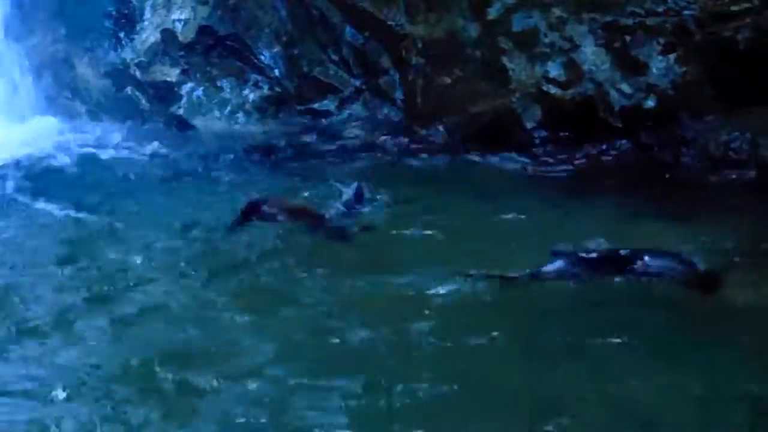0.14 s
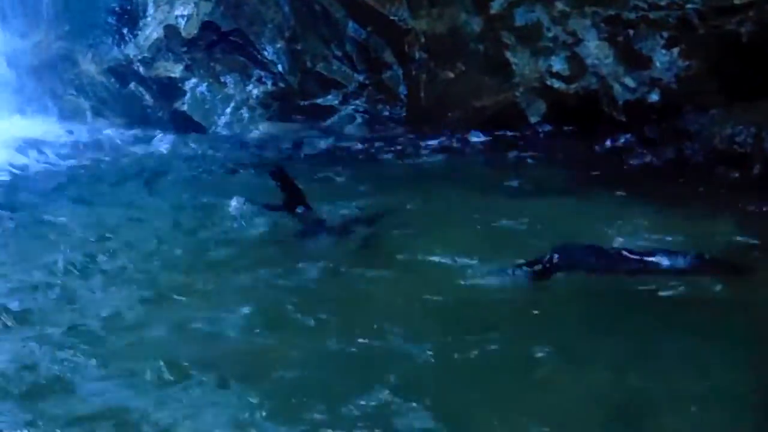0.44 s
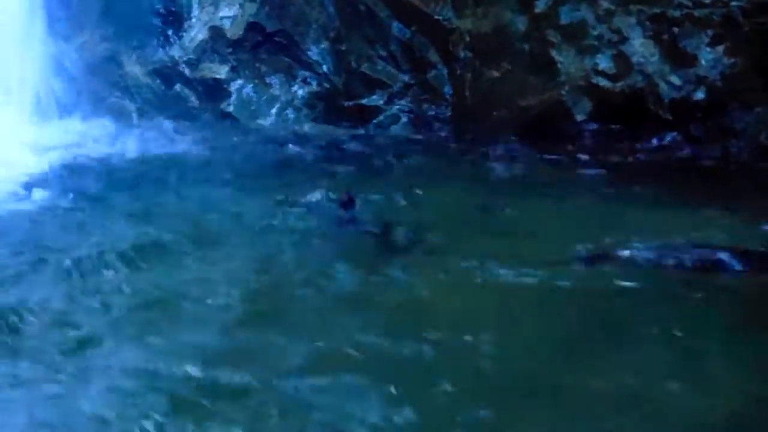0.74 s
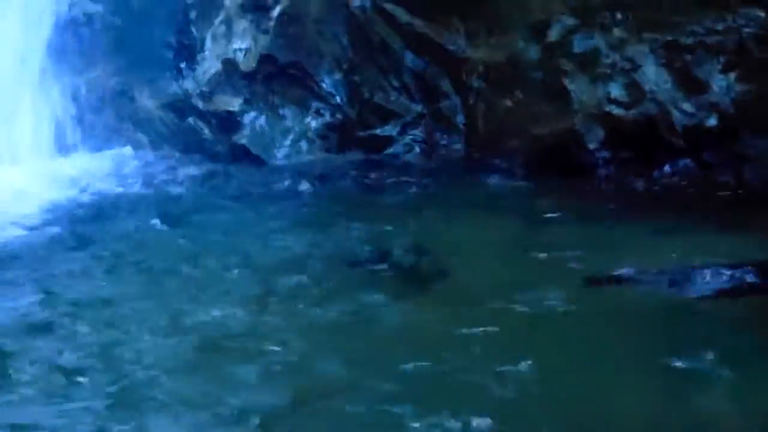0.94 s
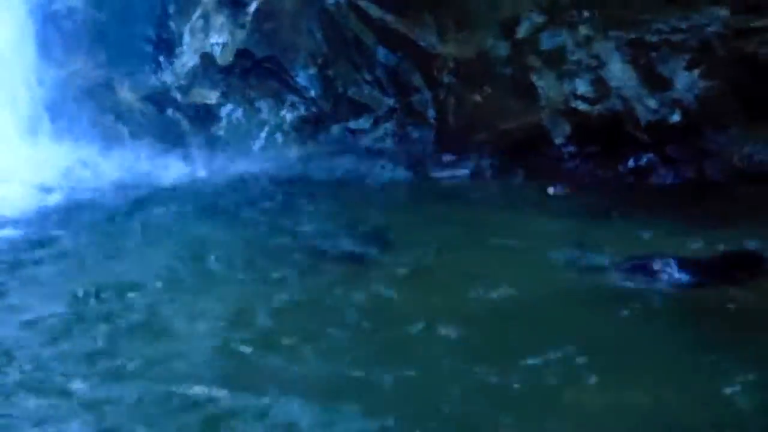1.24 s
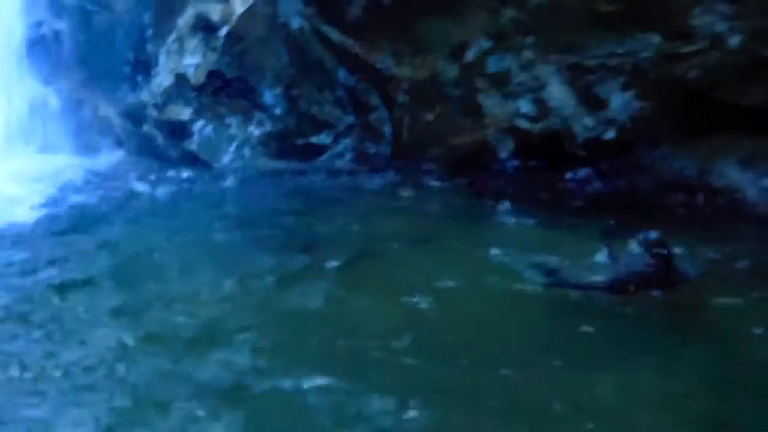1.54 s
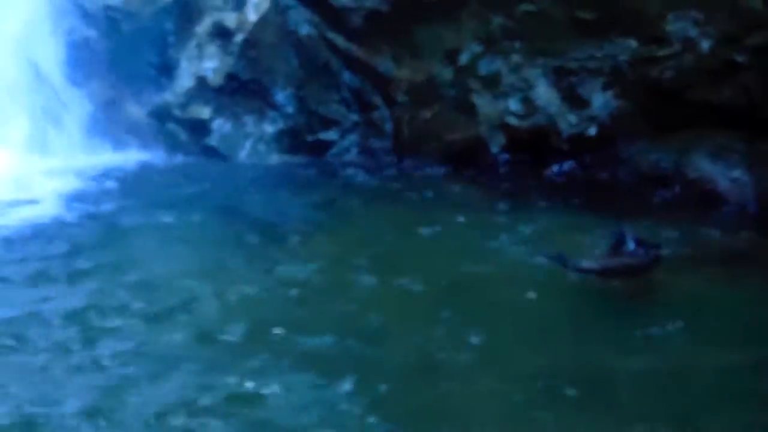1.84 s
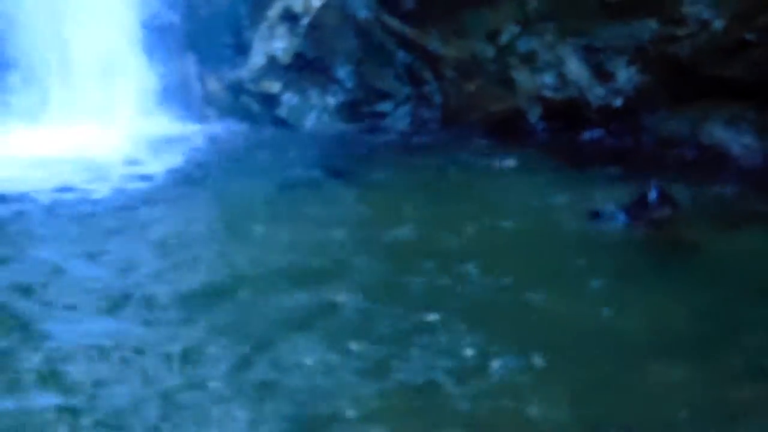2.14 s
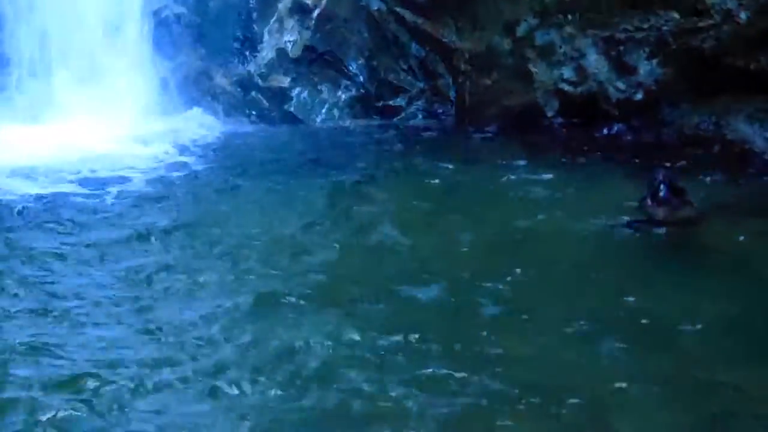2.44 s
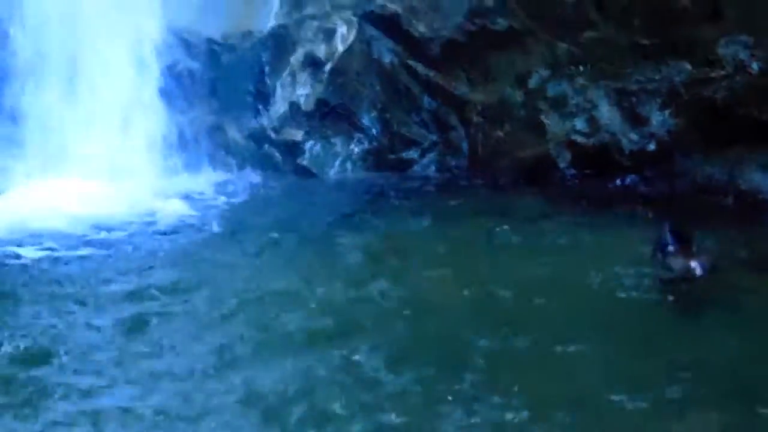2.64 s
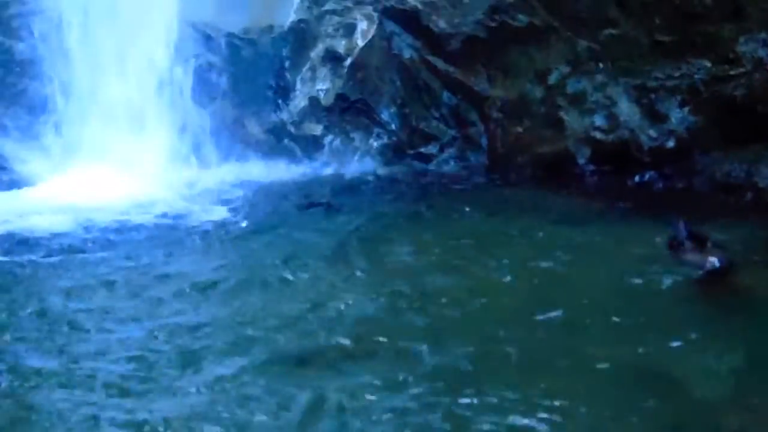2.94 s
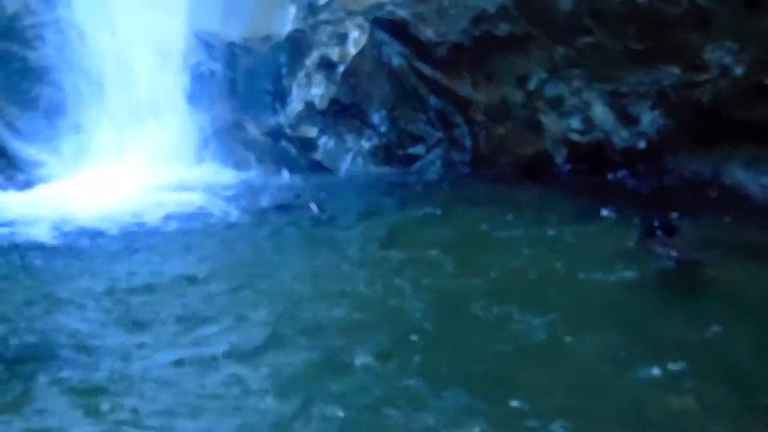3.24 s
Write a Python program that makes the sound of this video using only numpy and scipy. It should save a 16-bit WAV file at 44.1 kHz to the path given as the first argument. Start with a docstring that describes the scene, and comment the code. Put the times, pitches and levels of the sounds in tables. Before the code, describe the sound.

A loud waterfall rushes into a rocky pool outdoors, bright and hissing throughout, dipping slightly near the first second, then swelling with gulps and soft slaps; close stereo microphone catches low puffs of air.

```python
"""Waterfall into a rock pool

A bright rush of spray, made of flickering noise, with a dense patter of ringing drops, lies over
the hollow noise roar and gurgle of the plunge. The rush dips near 1.2 s and peaks near 2.3 s.
Noise bursts slap the pool, and gliding sines gulp as trapped air.
Puffs of air from the fall, made of low noise, buffet the two microphone ports."""
import sys
import numpy as np
from scipy import signal
from scipy.fft import rfft, irfft, next_fast_len
from scipy.io import wavfile
from scipy.ndimage import uniform_filter1d

SR = 44100
rng = np.random.default_rng(int(sys.argv[2]) if len(sys.argv) > 2 else 0)


def log_audio(samples):
    """Write samples as a 16-bit WAV file to the path given in sys.argv[1]."""
    # one column per channel
    frames = np.atleast_2d(samples).T
    # limit to full scale, then quantise
    limited = np.clip(frames, -1, 1)
    pcm = np.round(limited * 32767).astype(np.int16)
    wavfile.write(sys.argv[1], SR, pcm)


N = 149499


def spray(level_db):
    """Countless tiny impacts merge to a hiss, with ringing drops in it; the treble swings most."""
    # tone of the spray: (frequency [Hz], relative level per Hz [dB])
    spray_tone = [(40, -21), (150, -18.5), (600, -17.5), (950, -11.5), (1350, -3.5), (1800, -6), (2900, -2),
                  (4200, -1.35), (6000, -1.5), (7500, -0.5), (9500, 0.5), (11300, 2.5), (12600, 1.1),
                  (14200, -3), (15800, -9.5)]
    drops_db, fat_drops_db = -15, -15  # against the hiss
    hiss = rms_one(churn(flicker_db=0.82, rate_hz=9.8, count=36))
    drops = grains(per_s=2400, cycles=50, spread_db=3.5, low_hz=2194, high_hz=14700, count=48)
    fat_drops = grains(per_s=380, cycles=180, spread_db=2, low_hz=1692, high_hz=4606, count=56)
    mix = hiss + from_db(drops_db) * drops + from_db(fat_drops_db) * fat_drops
    rush = colour(mix, spray_tone)

    # the coarse splash below this pitch takes only a share of the rush's swing
    splash_top_hz, splash_follows = 4500, 0.57
    low_pass = signal.butter(2, splash_top_hz, fs=SR, output="sos")
    splash = signal.sosfiltfilt(low_pass, rush)
    fine_spray = rush - splash
    steadier = from_db((splash_follows - 1) * (level_db - level_db.mean()))

    trim_db, surge_db, surge_rate_hz = 1.49, 0.29, 25
    surging_db = trim_db + level_db + surge_db * drift(surge_rate_hz)
    return (fine_spray + steadier * splash) * from_db(surging_db)


def plunge(swing_db):
    """Clouds of air driven under water roar; single bubbles ring above them."""
    # tone of the roar: (frequency [Hz], relative level per Hz [dB])
    roar_tone = [(25, -7), (80, -10.5), (120, -4), (165, -7), (270, 0.5), (340, -4.5), (430, -4), (520, -5),
                 (620, -0.5), (740, 1.5), (900, -3), (1400, -5), (3000, -19)]
    roar_db, bubbles_db = -30, -34
    follows = 0.97  # share of the rush's swing
    roar = colour(churn(flicker_db=1.1, rate_hz=9.2, count=18), roar_tone)
    bubbles = grains(per_s=600, cycles=38, spread_db=2, low_hz=735, high_hz=3866, count=36)
    gurgle = from_db(roar_db) * roar + from_db(bubbles_db) * bubbles
    return gurgle * from_db(follows * swing_db)


def slaps():
    """A heavier clump of water lands with a short burst of splash."""
    # clumps hitting the pool: (time [s], level [dB])
    clumps = [(2.225, -28), (2.365, -26), (2.59, -25), (2.825, -22)]
    # tone of the bursts: (frequency [Hz], relative level per Hz [dB])
    slap_tone = [(250, -17), (700, -6), (1350, -2.5), (2300, -2), (4000, -11), (9000, -27)]
    force = sum(from_db(db) * swell(start_s, rise_s=0.012)[1] for start_s, db in clumps)
    return force * colour(rng.standard_normal((2, N)), slap_tone)


def gulps():
    """A big pocket of air swells and dies away, rising a little in pitch."""
    # pockets of trapped air: (time [s], starting pitch [Hz], level [dB])
    air_pockets = [(0.16, 267, -26), (.25, 722, -22), (.378, 760, -25), (.587, 1366, -26),
                   (1.138, 720, -30), (2.088, 745, -32), (2.11, 797, -21), (2.23, 976, -25),
                   (2.355, 715, -23.5), (2.378, 1350, -24), (2.587, 253, -32), (2.601, 694, -30),
                   (2.918, 258, -28)]
    rise_s, glide_per_s = 0.0057, 0.22  # glide as a share of the starting pitch
    out = np.zeros(N)
    for start_s, hz, db in air_pockets:
        age, envelope = swell(start_s, rise_s)
        cycles = hz * age * (1 + glide_per_s * age / 2) + rng.random()
        out += from_db(db) * envelope * np.sin(2 * np.pi * cycles)
    return out


def wind(swing_db):
    """Low turbulence, separate at each port: a faint draught and short puffs."""
    # puffs of air on the ports: (time [s], length [s], left level [dB], right level [dB])
    puffs = [(0.107, .05, -48, -31), (0.313, 0.066, -18.5, -33), (0.38, .055, -26, -33),
             (0.522, 0.08, -32, -25.5), (.58, .075, -38, -31), (0.83, 0.039, -28.5, -36),
             (0.955, 0.071, -27.5, -33), (1.017, 0.09, -23, -38), (1.134, 0.043, -33, -42),
             (1.515, 0.061, -30, -66), (1.73, 0.036, -32, -42.5), (2.354, 0.076, -53, -30.5),
             (2.985, 0.066, -38.5, -38)]
    # tone of the buffeting: (frequency [Hz], relative level per Hz [dB])
    buffet_tone = [(15, -17), (35, -1.5), (65, 4.5), (100, -10), (170, -15.5), (300, -60), (900, -72)]
    draught_db, draught_follows = -52, 3.9  # multiple of the rush's swing
    t = np.arange(N) / SR
    force = np.ones((2, 1)) * from_db(draught_db + draught_follows * swing_db)
    for start_s, length_s, left_db, right_db in puffs:
        shape = np.sin(np.pi * np.clip((t - start_s) / length_s, 0, 1))
        puff = from_db([[left_db], [right_db]]) * shape
        force = np.hypot(force, puff)  # unrelated airs add in power
    eddies = colour(rng.standard_normal((2, N)), buffet_tone)
    # even out the eddies over 25 ms, so that the puffs set the level
    local_level = np.sqrt(uniform_filter1d(eddies ** 2, size=1100) + 1e-6)
    return force * eddies / local_level


def stereo_blend(pair):
    """Blend the pair by frequency: nearly mono in the bass, mostly wider in the treble."""
    # stereo image: (frequency [Hz], likeness [0-1], left's phase lead [rad], left minus right [dB])
    image = [(200, 1, 0, 0), (800, .998, 0, 0), (1250, .99, 0, 0), (1600, .925, 0, 0), (2200, .92, 0, 0),
             (2750, .59, .25, -.4), (3800, .44, .53, .9), (4500, .37, .4, 2), (6400, .38, .1, .8),
             (7300, .61, .15, -.4), (9300, .54, .45, -1.3), (10400, .47, .75, -1.6), (12800, .47, .85, -.7),
             (15500, .22, .55, 2.2)]
    size = next_fast_len(N)
    alike, lead, pan_db = at_hz(image, np.fft.rfftfreq(size, 1 / SR))
    alike = np.clip(alike, 0, .9995)
    mid, side = rfft(pair, size) * np.sqrt([(1 + alike) / 2, (1 - alike) / 2])
    turn = from_db(pan_db / 2) * np.exp(.5j * lead)  # half the difference on each channel
    left, right = (mid + side) * turn, (mid - side) / turn
    return irfft(np.array([left, right]), size)[:, :N]


def churn(flicker_db, rate_hz, count):
    """Two unrelated noises, split into bands; each band flickers on its own, alike in both noises."""
    size = next_fast_len(N)
    white = rfft(rng.standard_normal((2, size)))
    edges = np.geomspace(150, 13000, count - 1)
    band = np.searchsorted(edges, np.fft.rfftfreq(size, 1 / SR))
    out = np.zeros((2, N))
    for k in range(count):
        noise = irfft(white * (band == k), size)[:, :N]
        out += noise * from_db(flicker_db * drift(rate_hz))
    return out


def grains(per_s, cycles, spread_db, low_hz, high_hz, count):
    """Random rings of uneven size and direction at count pitches, falling 60 dB in so many cycles."""
    out = np.zeros((2, N))
    for hz in np.geomspace(low_hz, min(high_hz, .45 * SR), count):
        born = np.flatnonzero(rng.random(N) < per_s / count / SR)
        size, angle = rng.random((2, N))[:, born]
        strength = from_db(-spread_db * np.log(size + 0.0043))  # a few stand far out
        direction = np.array([np.cos(2 * np.pi * angle), np.sin(2 * np.pi * angle)])
        clicks = np.full((2, N), 1e-18)
        clicks[:, born] = strength * direction
        # a two-pole resonator rings at each click
        r = from_db(-60 * hz / (cycles * SR))
        w = 2 * np.pi * hz / SR
        out += signal.lfilter([np.sqrt(w), 0, -np.sqrt(w)], [1, -2 * r * np.cos(w), r * r], clicks)
    return rms_one(out)


def swell(start_s, rise_s):
    """Seconds since an event, and its envelope: a quick rise and a slower fall."""
    age = np.clip(np.arange(N) / SR - start_s, 0, 1)
    return age, age / rise_s * np.exp(1 - age / rise_s)


def drift(rate_hz):
    """Slow random wander of spread 1: low-passed noise, drawn at every 40th sample."""
    r = np.exp(-80 * np.pi * rate_hz / SR)
    steps = rng.standard_normal(N // 40 + 2002)
    slow = signal.lfilter([1], [1, -2 * r, r * r], steps)[2000:]  # drop the filter's start
    return np.interp(np.arange(N) / 40, np.arange(len(slow)), rms_one(slow))


def colour(x, spectrum):
    """Filter a sound by a spectrum and bring it to unit power."""
    size = next_fast_len(N)
    db, = at_hz(spectrum, np.fft.rfftfreq(size, 1 / SR))
    return rms_one(irfft(rfft(x, size) * from_db(db), size)[..., :N])


def at_hz(points, hz):
    """The columns of a table, read on a log-frequency axis."""
    f, *columns = np.transpose(points)
    return [np.interp(np.log(hz + 1), np.log(f), c) for c in columns]


def rms_one(x):
    """Scale to unit power."""
    return x / np.sqrt(np.mean(x ** 2) + 1e-20)


def from_db(db):
    """Decibels to gain."""
    return 10 ** (np.asarray(db) / 20)


def scene():
    """The fall with its slaps, blended in stereo, then the gulps and the air on the ports."""
    # level of the rush: (time [s], level before the spray's trim [dB])
    rush_level = [(0, -14.5), (.62, -15), (.75, -14), (.92, -14.5), (1.02, -15), (1.15, -15), (1.2, -17.5),
                  (1.38, -15.5), (1.6, -16.5), (2.01, -16.5), (2.055, -15), (2.32, -13), (2.46, -15),
                  (2.85, -14.5), (2.9, -16), (3.39, -15.5)]
    level_db = np.interp(np.arange(N) / SR, *np.transpose(rush_level))
    swing_db = level_db - level_db.mean()
    water = stereo_blend(spray(level_db) + plunge(swing_db) + slaps())
    return water + gulps() + wind(swing_db)


def record(dry):
    """The highest peaks are rounded and the top is cut steeply."""
    headroom, cutoff_hz = .9, 15800
    rounded = dry / (1 + (dry / headroom) ** 10) ** (1 / 10)
    low_pass = signal.firwin(601, cutoff_hz, fs=SR, window="blackman")
    return signal.fftconvolve(rounded, low_pass[None], "same", axes=1)


dry = scene()
out = record(dry)
log_audio(out)
```